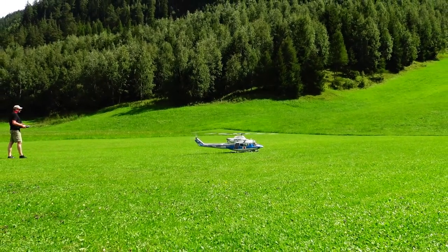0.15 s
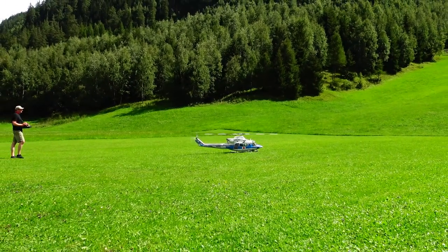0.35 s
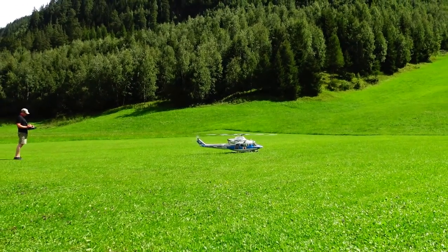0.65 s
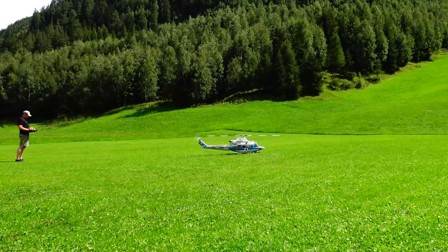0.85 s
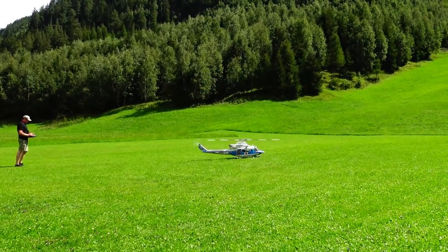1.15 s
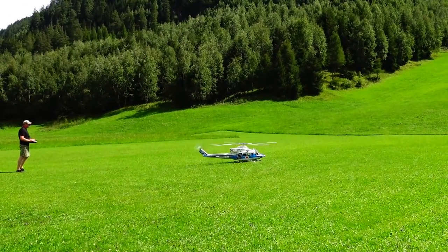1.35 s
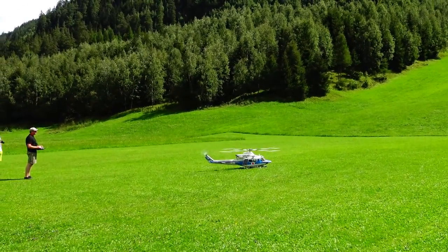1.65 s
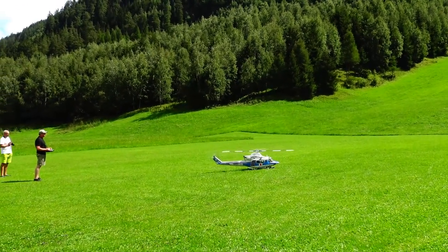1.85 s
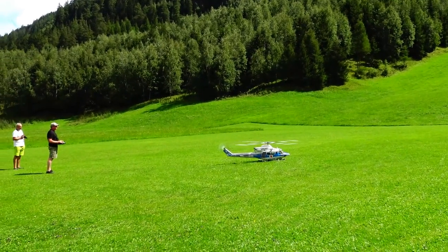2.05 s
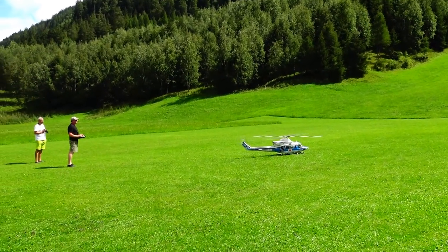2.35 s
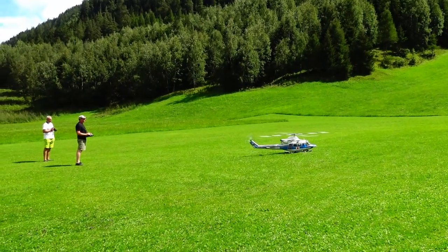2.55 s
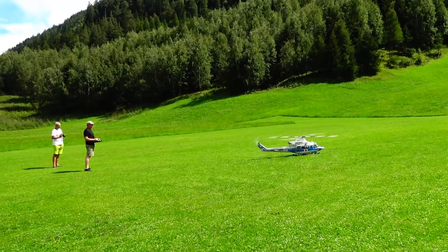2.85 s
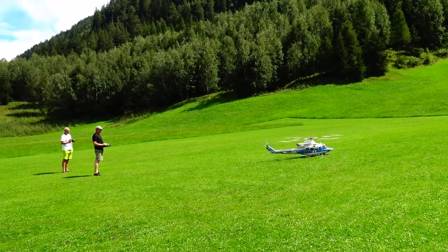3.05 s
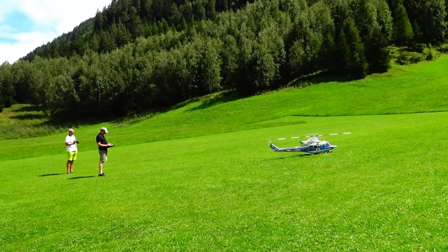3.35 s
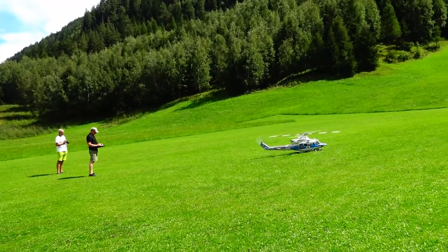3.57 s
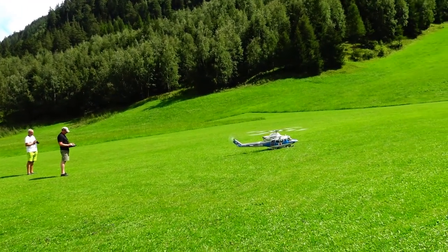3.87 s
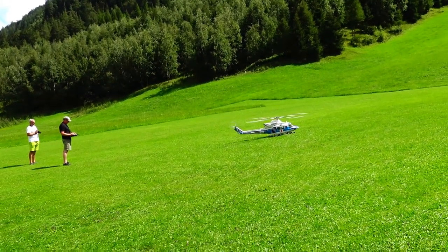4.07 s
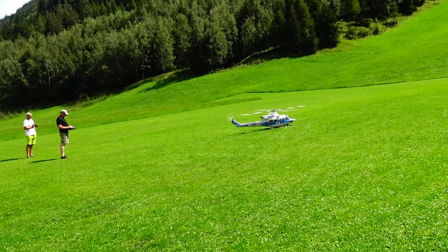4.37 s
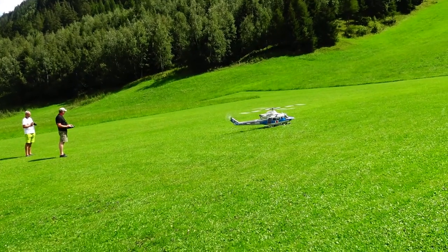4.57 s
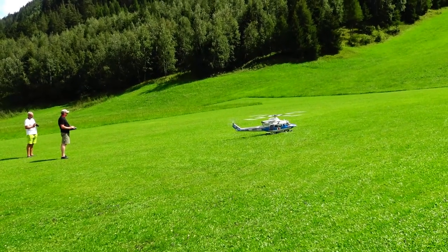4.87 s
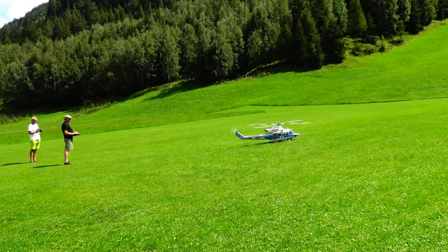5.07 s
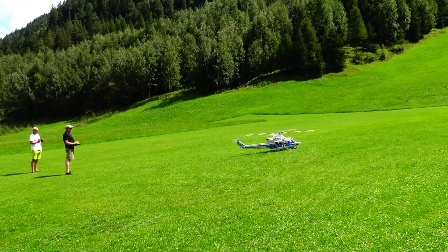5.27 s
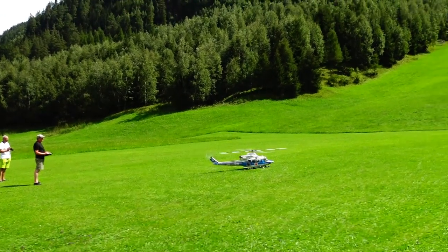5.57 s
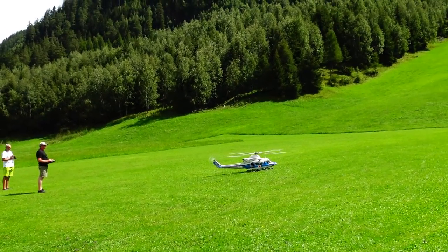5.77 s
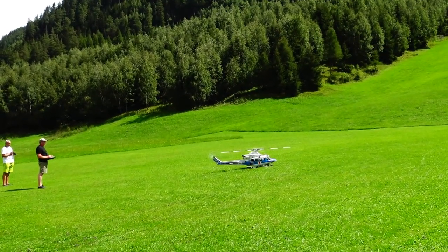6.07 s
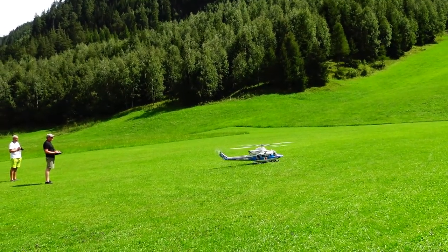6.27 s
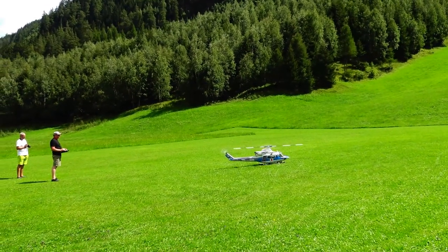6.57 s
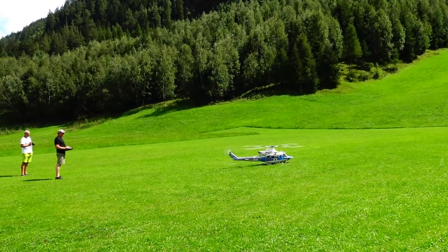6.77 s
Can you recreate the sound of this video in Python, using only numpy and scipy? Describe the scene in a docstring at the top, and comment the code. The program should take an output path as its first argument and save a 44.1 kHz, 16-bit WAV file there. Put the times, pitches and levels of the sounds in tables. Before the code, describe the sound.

Thin, fluttering high turbine whine with breathy exhaust roar and a low rotor drone, slowly spooling up and growing fuller outdoors.

```python
"""From the start a turbine model helicopter some way off on a grass slope whines, drones and hisses in light wind.
Turbine, gears, main and tail rotor are sines on one cycle count, so all climb together to the end.
The gear mesh comes up after 0.6 s; the range under the roar fills in at about 1 s.
Roar, hiss and swish are filtered noise that swells and fades; noise gusts rumble on the microphone.
Two higher blade harmonics come out at about 6 s."""
import sys
import numpy as np
from scipy import signal
from scipy.fft import rfft, irfft, next_fast_len
from scipy.io import wavfile

SR = 44100
rng = np.random.default_rng(int(sys.argv[2]) if len(sys.argv) > 2 else 0)


def wrap_up_sound(samples):
    """Save the sound to the file named by the first command line argument, as 16-bit audio."""
    columns = np.atleast_2d(samples).T
    # keep every value between -1 and 1, then stretch to whole-number steps
    tamed = np.clip(columns, -1, 1)
    steps = np.round(tamed * 32767).astype(np.int16)
    wavfile.write(sys.argv[1], SR, steps)


N = 305172

# Spool-up. Each row: time in seconds, turbine whine in Hz.
SPOOL_UP = [(0.0, 7872), (0.49, 7958), (0.74, 8012), (2.72, 8336), (2.97, 8383), (3.71, 8498), (4.45, 8647),
            (4.94, 8758), (5.44, 8858), (5.68, 8904), (6.92, 9114)]
# whine cycles and tail rotor turns per main rotor blade pass
WHINE_PER_BLADE, TAIL_PER_BLADE = 173.35, 1.2


def from_db(db):
    """Gain of a level in dB."""
    return 10 ** (np.asarray(db) / 20)


def rms_one(x):
    """Scale to rms 1."""
    return x / np.sqrt(np.mean(x ** 2) + 1e-20)


def in_time(rows):
    """Columns of a table after the time in seconds, one value a sample."""
    time_s, *columns = np.transpose(rows)
    return [np.interp(np.arange(N) / SR, time_s, column) for column in columns]


def coloured(x, points):
    """Filter by a spectrum of (Hz, dB) points, interpolated on a log-frequency axis."""
    size = next_fast_len(N)
    bin_hz = np.maximum(np.arange(size // 2 + 1) * SR / size, 1)
    point_hz, point_db = np.transpose(points)
    gain = from_db(np.interp(np.log(bin_hz), np.log(point_hz), point_db))
    return irfft(rfft(x, size) * gain, size)[..., :N]


def drift(rate_hz):
    """Slow random wander of rms 1: noise through two equal poles, one value per 40 samples, interpolated."""
    r = np.exp(-80 * np.pi * rate_hz / SR)
    noise = rng.standard_normal(N // 40 + 2002)
    slow = signal.lfilter([1], [1, -2 * r, r * r], noise)[2000:]   # drop the settling
    return np.interp(np.arange(N) / 40, np.arange(len(slow)), rms_one(slow))


def air(colour, patchy_db, rate_hz, count=6):
    """Noise of a colour, rms 1; air turbulence makes each slice of its range waver on its own."""
    size = next_fast_len(N)
    spectrum = rfft(coloured(rng.standard_normal(N), colour), size)
    log_hz = np.log(np.maximum(np.arange(len(spectrum)) * SR / size, 1))
    centres = np.log(np.geomspace(colour[0][0], colour[-1][0], count))
    out = 0
    for k in range(count):
        weight = np.interp(log_hz, centres, np.arange(count) == k)
        piece = irfft(spectrum * weight, size)[:N]
        out = out + piece * from_db(patchy_db * drift(rate_hz))
    return rms_one(out)


def tone(cycles, level_db):
    """A sine of given rms level on a running count of cycles, from a random phase."""
    return np.sqrt(2) * from_db(level_db) * np.sin(2 * np.pi * (cycles + rng.random()))


def with_speed(mid_db, gain_db):
    """A level that moves in step with the spool-up: dB at mid speed, dB gained from lowest to highest."""
    whine_hz = in_time(SPOOL_UP)[0]
    speed = (whine_hz - whine_hz.min()) / np.ptp(whine_hz)
    return mid_db + gain_db * (speed - .5)


def swell(peak_s, rise_s, fall_s):
    """A bell of height 1 at peak_s, with its own rise and fall spread."""
    late_s = np.arange(N) / SR - peak_s
    return np.exp(-.5 * (late_s / np.where(late_s < 0, rise_s, fall_s)) ** 2)


def turbine(blades):
    """Whine, gear mesh and faint tones locked to the rotor; the air path shakes phase and level."""
    # Each row: time in seconds, rise spread in seconds, dB relative to the usual whine level.
    flares = [(0.0, .06, -4), (0.18, .04, 15.5), (0.827, 0.064, 9.5), (1.0, .07, 8), (1.247, 0.053, 10),
              (1.444, 0.088, 12.5), (1.67, 0.065, 10), (1.935, 0.083, 12), (2.3, 0.04, 9), (2.603, 0.07, 7),
              (2.85, 0.13, 5), (3.127, 0.035, 6), (3.583, 0.097, 11), (3.83, 0.073, 9), (4.04, 0.08, 11),
              (4.4, 0.14, 4.5), (4.956, 0.19, 6), (5.173, 0.026, 6), (5.425, 0.064, 7), (5.66, .09, 8),
              (6.04, 0.07, 9), (6.314, 0.053, 9), (6.673, 0.044, 6), (6.832, .04, 7)]
    # Gear mesh tone. Each row: time in seconds, level in dB before its waver.
    gear_mesh = [(0.0, -41), (0.4, -41.5), (0.6, -37), (2.19, -29.5), (2.5, -31), (2.87, -27.5),
                 (3.45, -34.5), (4.05, -30), (4.22, -33.5), (4.7, -27.5), (5.2, -30), (5.45, -36),
                 (5.74, -29), (6.1, -35), (6.92, -30.5)]
    # Fainter gear and turbine tones: multiples of the blade rate; their levels in dB before the flicker.
    faint_orders = [5.648, 60, 72.02, 113.03, 135.62, 141.26, 144.46, 146.92, 171.36, 226.0]
    faint_levels_db = [-49, -52, -56, -57, -62, -59, -64, -63, -62, -69]
    mesh_per_blade, fall_per_rise = 30, .6   # a flare drops quicker than it rises
    flicker_db, flicker_hz = 4.0, 2.0

    whine_db = with_speed(-43.5, 4.5)
    for peak_s, rise_s, db in flares:
        whine_db = whine_db + db * swell(peak_s, rise_s, fall_per_rise * rise_s)
    whine_db = whine_db + 2.27 * drift(44) + 1.6 * drift(10)
    whine = tone(WHINE_PER_BLADE * blades + 0.059 * drift(6.9), whine_db)
    mesh_db = in_time(gear_mesh)[0] + 1.2 * drift(8.9)
    mesh = tone(mesh_per_blade * blades + 0.024 * drift(18), mesh_db)
    faint = sum(tone(order * blades + 0.054 * drift(7.3), db + flicker_db * drift(flicker_hz))
                for order, db in zip(faint_orders, faint_levels_db))
    return whine + mesh + faint


def rotors(blades, waver_db=1.5):
    """Blade passes of both rotors: low harmonics whose balance shifts with speed."""
    # Each row: multiple of the blade rate, dB at mid speed, dB gained from lowest to highest speed.
    main_harmonics = [(2, -51.5, -10), (3, -36, 3.5), (4, -39.5, 7.5), (5, -35, -0.5), (6, -37, 8),
                      (7, -46, 10), (8, -67, -16), (10, -50, -15), ]
    # Each row: multiple of the tail rotor turns, dB at mid speed, dB gained from lowest to highest speed.
    tail_harmonics = [(2, -39, -0.5), (3, -45, -1), (4, -42.5, 5), (6, -50, 13)]
    # Higher blade harmonics that come out late and stay. Each row: multiple of the blade rate, dB.
    late_harmonics = [(11, -44), (12, -43.5)]
    late_s, late_rise_s = 6.02, 0.18

    main = sum(tone(round(k) * blades, with_speed(db, gain_db) + waver_db * drift(0.8))
               for k, db, gain_db in main_harmonics)
    tail = sum(tone(round(k) * TAIL_PER_BLADE * blades, with_speed(db, gain_db) + waver_db * drift(0.29))
               for k, db, gain_db in tail_harmonics)
    late = sum(tone(round(k) * blades, db + waver_db * drift(1.1)) for k, db in late_harmonics)
    return main + tail + swell(late_s, late_rise_s, np.inf) * late


def duct(x, centre_hz, width_hz=435):
    """Exhaust duct resonance, rms 1: a two-pole filter whose centre wanders, stepped in blocks."""
    out, state, r = np.zeros(N), np.zeros(2), np.exp(-np.pi * width_hz / SR)
    for i in range(0, N, 256):
        poles = [1, -2 * r * np.cos(2 * np.pi * centre_hz[i] / SR), r * r]
        out[i:i + 256], state = signal.lfilter([1, 0, -1], poles, x[i:i + 256], zi=state)
    return rms_one(out)


def puffs_db():
    """Rise of the treble under bright puffs of blade swish, and its dips in a few lulls."""
    # Each row: peak time in seconds, dB relative to the steady swish.
    puffs = [(0.17, 2), (1.24, 7), (1.68, 6), (1.85, 3.5), (2.33, 4), (3.32, 1.5), (3.55, 3.5), (3.85, 5.5),
             (4.41, 4), (5.02, 3), (5.28, 4.5), (5.67, 1.5), (5.95, 2.5), (6.3, 4), (6.51, 2.5),
             (0.68, 0.5), (2.62, 3), (4.0, 2), (3.0, -5.5), (6.22, -1.5), (6.62, -5)]
    rise_s, fall_s = .04, 0.055
    return sum(db * swell(peak_s, rise_s, fall_s) for peak_s, db in puffs)


def exhaust():
    """Broad noise roar with the duct ringing on top, and the jet hiss above, as the moving air carries them."""
    # Each row: time in seconds, roar in dB, duct centre in Hz.
    roar_course = [(0.05, -27.5, 2050), (0.92, -23.5, 2080), (1.08, -23.5, 1970), (1.19, -18, 2130),
                   (1.52, -21.5, 2120), (1.77, -19, 1990), (1.9, -22, 2020), (2.3, -20, 2050),
                   (2.68, -20.5, 2060), (2.91, -23.5, 1940), (3.18, -17.5, 2070), (3.89, -19, 2000),
                   (3.99, -25.5, 1880), (4.28, -18.5, 2050), (4.75, -21.5, 2110), (5.0, -18, 2070),
                   (5.22, -16, 2050), (5.4, -19, 2000), (5.7, -18, 2020), (5.9, -21.5, 2020),
                   (6.26, -16.5, 2010), (6.65, -23, 1920), (6.9, -15.5, 1970)]
    # Range under the roar, filling in once the exhaust takes load. Each row: time in seconds, dB.
    flank_course = [(0.0, -44), (0.92, -43), (1.1, -34.5), (1.55, -32), (6.92, -28)]
    # Jet hiss. Each row: time in seconds, lower band in dB before its band-pass, upper in dB before puffs.
    jet_course = [(0.0, -29, -33.5), (0.45, -31.5, -36), (0.67, -28.5, -30.5), (0.85, -28.5, -34),
                  (1.04, -27, -32), (1.2, -25, -36), (1.35, -26.5, -36.5), (1.4, -29.5, -36.5),
                  (1.71, -29.5, -34.5), (2.1, -32.5, -33.5), (2.29, -33, -32.5), (3.04, -33.5, -37.5),
                  (3.24, -30.5, -28.5), (3.41, -30, -31), (3.83, -30, -30), (3.95, -32, -36.5),
                  (4.2, -31, -35), (4.35, -25, -33), (4.61, -30.5, -34.5), (4.86, -29, -35.5),
                  (4.97, -27, -31), (5.3, -28.5, -30), (5.93, -30, -33), (6.03, -33.5, -35.5),
                  (6.17, -25.5, -32), (6.3, -25, -27.5), (6.45, -33, -36.5), (6.84, -32.5, -30.5),
                  (6.92, -24, -30)]
    # Spectra. Each row: Hz, relative dB per Hz.
    roar_colour = [(800, -14), (1150, -6), (1500, -1.5), (2000, -3.5), (2400, -9), (2800, -13.5),
                   (3500, -37)]
    flank_colour = [(450, -57), (620, -2.5), (800, -0.5), (1000, 2), (1250, 6.5), (1500, 6), (2000, -20)]
    lower_colour = [(2000, -16.5), (2600, 1), (3200, 2), (4000, -3), (4400, -20)]
    upper_colour = [(3700, -17.5), (4200, 5), (5000, 1), (6000, 0.5), (7500, -5), (8800, -6.5),
                    (10000, -24)]
    # Lower hiss fades out beyond these two edges in Hz.
    lower_band_hz = [1240, 9500]
    duct_db = 9.5   # relative to the broad roar
    puff_share = 0.46   # share of a puff's rise that the upper hiss takes

    roar_db, centre_hz = in_time(roar_course)
    flank_db, = in_time(flank_course)
    lower_db, upper_db = in_time(jet_course)
    broad = air(roar_colour, patchy_db=1.23, rate_hz=15.0, count=8)
    roar = rms_one(broad + from_db(duct_db) * duct(broad, centre_hz))
    flank = air(flank_colour, patchy_db=0.4, rate_hz=1.0)
    lower = air(lower_colour, patchy_db=1.5, rate_hz=2.0, count=10)
    lower = signal.lfilter(*signal.butter(2, lower_band_hz, "band", fs=SR), lower)
    upper = air(upper_colour, patchy_db=1.6, rate_hz=2.0, count=12)
    low_part = from_db(roar_db) * roar + from_db(flank_db) * flank
    jet = from_db(lower_db) * lower + from_db(upper_db + puff_share * puffs_db()) * upper
    return low_part, jet


def blade_swish():
    """Treble noise of the blades, lifted by the puffs and wavering in level."""
    # Each row: Hz, relative dB per Hz.
    swish_colour = [(6000, -8), (7500, 4), (9000, 5), (11000, 4.5), (13000, 1.5), (14500, -1), (15500, -5),
                    (16500, -23)]
    level_db = with_speed(-39.5, 1.5) + puffs_db() + 1.25 * drift(6.2)
    return from_db(level_db) * air(swish_colour, patchy_db=0.5, rate_hz=2.9, count=7)


def fuselage(x, come_and_go_db=2.5):
    """Narrow intake and fuselage resonances that rise out of the hiss by wandering amounts."""
    # Each row: centre in Hz, width in Hz, peak in dB before it comes and goes.
    resonances = [(2756, 210, 3), (3884, 95, 4), (4950, 91, 6), (5250, 150, 2), (6810, 180, 4),
                  (11000, 580, 2)]
    out = x.copy()
    for hz, width_hz, db in resonances:
        r = np.exp(-np.pi * width_hz / SR)
        poles = [1, -2 * r * np.cos(2 * np.pi * hz / SR), r * r]
        peak = signal.lfilter([(1 - r * r) / 2, 0, (r * r - 1) / 2], poles, x)
        out += (from_db(db) - 1) * from_db(come_and_go_db * drift(8.4)) * peak
    return out


def tail_chop(blades, depth=0.086):
    """Gain ripple on the hiss as the two tail blades cut it."""
    return 1 + depth * np.sin(2 * np.pi * 2 * TAIL_PER_BLADE * blades)


def downwash():
    """Low wash and rustle: two bands of noise whose levels follow speed, without treble."""
    # Each row: Hz, relative dB per Hz.
    wash_colour = [(60, -32), (110, -5), (200, -0.5), (260, 2.5), (330, -1.5), (400, -17.5), (500, -20)]
    rustle_colour = [(280, -4), (350, 4), (420, 3.5), (560, 0.5), (700, -11), (900, -31)]
    fades_hz = 5000
    wash = from_db(with_speed(-29, 3.5)) * air(wash_colour, patchy_db=0.8, rate_hz=1.4)
    rustle = from_db(with_speed(-34, -5.5)) * air(rustle_colour, patchy_db=1.95, rate_hz=8.2)
    return signal.lfilter(*signal.butter(2, fades_hz, fs=SR), wash + rustle)


def wind():
    """Bass noise over a calm floor: gusts strike the microphone quickly and die away."""
    # Each row: peak time in seconds, fall spread in seconds, peak in dB.
    gusts = [(0.15, .2, -37), (0.63, 0.16, -40), (2.3, .4, -41), (3.15, 0.82, -39), (4.45, 0.081, -49),
             (5.1, .5, -41), (5.9, 0.18, -37), (6.35, 0.09, -39), (6.59, .4, -35)]
    # Each row: Hz, relative dB per Hz.
    wind_colour = [(15, -10), (25, -10), (45, -2.5), (70, 0), (110, 6.5), (200, -49)]
    calm_db, rise_s = -57, .05
    strength = from_db(calm_db)
    for peak_s, fall_s, db in gusts:
        strength = strength + from_db(db) * swell(peak_s, rise_s, fall_s)
    return strength * air(wind_colour, patchy_db=3.0, rate_hz=5.0, count=3)


def stereo(mid):
    """The middle range follows the microphone's swing past the source; the bass wanders a little between
    the sides; a faint delayed copy widens the sound."""
    # Each row: time in seconds, left minus right in dB for the swing and for the bass wander, before weighting.
    balance = [(0.2, -0.5, -1.0), (1.47, -1.0, 1.5), (2.83, -3.0, -0.5), (3.4, -2.3, -0.5),
               (4.13, -1.0, 2.0), (5.9, -0.7, 1.5), (6.2, -1.0, 0.0)]
    # Weight of the swing over the spectrum. Each row: Hz, dB.
    swing_colour = [(150, -30), (250, -2), (500, 0), (1000, -8), (2000, -14.5), (4000, -33), (8000, -45)]
    # Weight of the bass wander over the spectrum. Each row: Hz, dB.
    bass_wander_colour = [(30, -3), (150, 2.5), (200, -9), (300, -66)]
    # Spectrum of the widening copy. Each row: Hz, dB.
    width_colour = [(30, -21), (200, -37), (500, -21), (1100, -56), (2400, -46), (3800, -52), (15000, -48)]
    width_delay_s = .021

    # side-to-mid ratio of a level difference
    swing, bass_wander = (np.tanh(np.log(from_db(db)) / 2) for db in in_time(balance))
    side = swing * coloured(mid, swing_colour) + bass_wander * coloured(mid, bass_wander_colour)
    side += coloured(np.roll(mid, round(width_delay_s * SR)), width_colour)
    return np.array([mid + side, mid - side])


def scene():
    """All sources come from one far point, heard nearly in the centre."""
    machine_from_hz = 60   # the small machine radiates little deeper; wind fills the range below
    blades = np.cumsum(in_time(SPOOL_UP)[0]) / SR / WHINE_PER_BLADE   # running count of blade passes
    roar, jet = exhaust()
    hiss = tail_chop(blades) * fuselage(jet + blade_swish())
    machine = turbine(blades) + rotors(blades) + roar + hiss + downwash()
    machine = signal.lfilter(*signal.butter(2, machine_from_hz, "high", fs=SR), machine)
    return stereo(machine + wind())


def record(dry):
    """The top is cut steeply by one elliptic low-pass run twice."""
    cutoff_hz = 15750
    steep = signal.ellip(12, .3, 50, cutoff_hz, fs=SR, output="sos")
    return signal.sosfilt(steep, signal.sosfilt(steep, dry))


dry = scene()
out = record(dry)
wrap_up_sound(out)
```